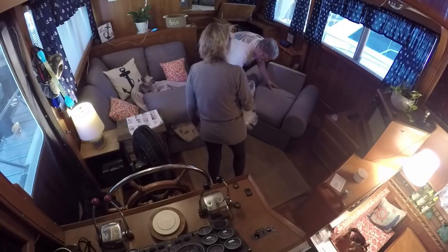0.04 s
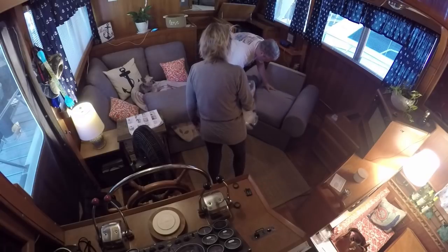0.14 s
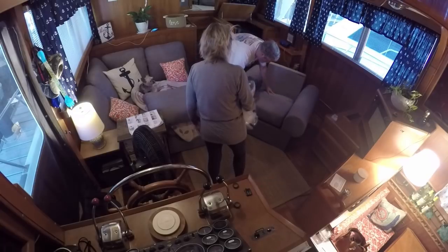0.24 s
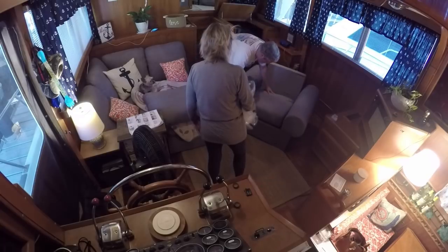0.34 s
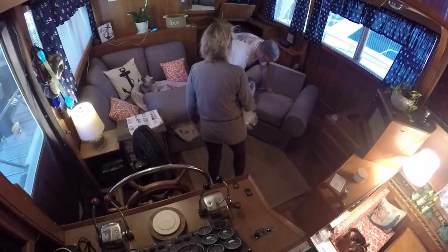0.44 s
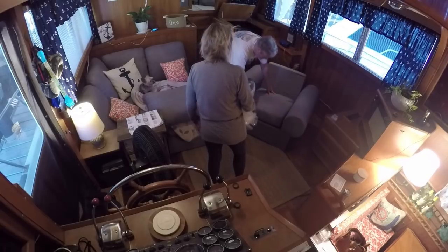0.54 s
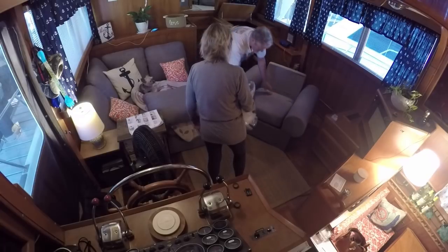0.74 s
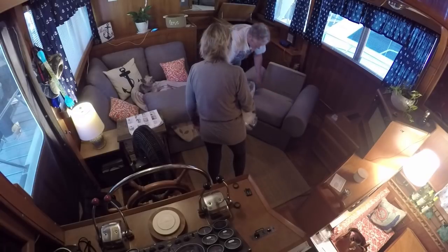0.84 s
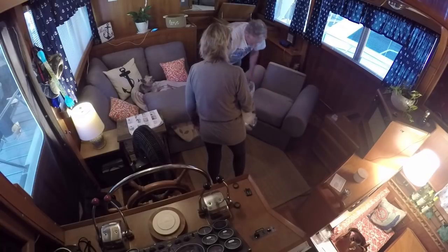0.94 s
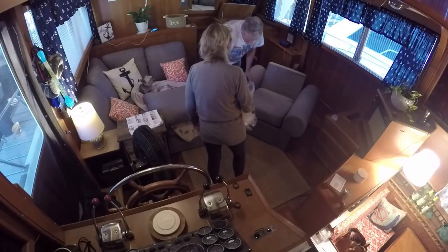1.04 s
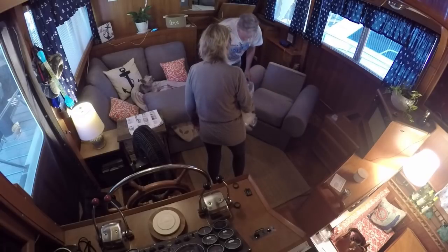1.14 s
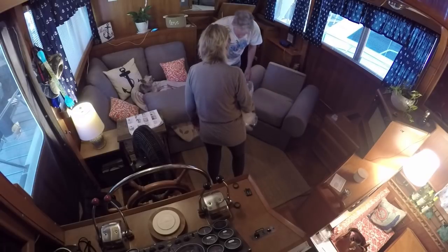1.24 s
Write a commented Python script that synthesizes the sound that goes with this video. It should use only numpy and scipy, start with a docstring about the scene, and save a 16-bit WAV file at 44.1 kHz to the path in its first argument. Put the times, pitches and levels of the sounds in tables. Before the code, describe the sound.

Upholstered furniture thumps into place in a small wood-panelled cabin. Its cloth slides and its frame groans briefly before the heavy landing and a wooden clack. A softer thump follows, then faint rustles over a low rumble.

```python
"""In a small wood-panelled cabin, a piece of upholstered furniture is shoved into place.
Its cloth slides and its frame groans. It lands with a heavy thump and a wooden clack, then drops
once more, softly, and its weight keeps the floor swaying. Faint rustles, two tiny ticks and small
bumps follow, over a low rumble, a hiss of air and an electric hum."""
import sys
import numpy as np
from scipy import signal
from scipy.fft import rfft, irfft
from scipy.io import wavfile

SR = 44100
rng = np.random.default_rng(int(sys.argv[2]) if len(sys.argv) > 2 else 0)


def to_wav(s):
    """Save 16-bit WAV."""
    ch = np.atleast_2d(s).T  # columns
    pcm = np.round(np.clip(ch, -1, 1) * 32767)  # PCM
    wavfile.write(sys.argv[1], SR, pcm.astype(np.int16))


N = 57330
T = np.arange(N) / SR

# The tone colour of each noise. Each row: pitch in Hz, relative level in dB.
AIR_COLOUR = [(100, -7.5), (180, -7), (250, -7.5), (360, -18.5), (480, -13.5), (850, -18.5), (1200, -22),
              (4700, -28), (15000, -38)]
RUMBLE_COLOUR = [(10, 15.5), (21, 7.5), (30, 1), (45, -1.5), (70, -4), (100, -22), (160, -21.5),
                 (400, -69.5)]
SLIDE_COLOUR = [(150, 8), (330, 12), (520, -1), (870, 3), (1300, -8), (2300, -3), (3500, -10), (6000, -17),
                (9000, -23), (15000, -35)]
BUMP_COLOUR = [(120, 0), (280, 0), (410, 3), (470, -12.5), (540, -0.5), (660, -9), (1000, -4.5),
               (2000, -12.5), (8000, -31)]
ECHO_COLOUR = [(120, 1), (250, 5.5), (550, -2.5), (950, -6.5), (1400, -9), (2300, -15.5), (2900, -22),
               (3500, -9.5), (7000, -10), (15000, -31)]
CLACK_COLOUR = [(700, -36), (1500, -9), (2000, 5), (2400, 4), (2950, 0), (3300, -10), (3900, -13),
                (6000, -23.5), (15000, -41)]
TICK_COLOUR = [(3000, -8), (6000, 2), (12000, -7), (15000, -13)]
RUSTLE_COLOUR = [(300, 4), (900, 2), (1600, 2.5), (2600, 4.5), (4500, 1), (7000, -11.5), (15000, -22)]

# How loud the rumble is. Each row: time in seconds, level in dB.
RUMBLE_LOUDNESS = [(0, -21.5), (.14, -35), (.55, -31), (.9, -40), (1.3, -44)]
# The hum's steady tones. Each row: pitch in Hz, average level in dB.
HUM_TONES = [(118.9, -48), (468.3, -71.5), (721.4, -70.5), (839.8, -69.5)]
# Cloth slides, and later rustles. Each row: peak time, rise and fall in seconds, level in dB.
CLOTH_SLIDES = [(.145, 0.044, 0.043, -49.5), (.192, 0.033, 0.14, -31.5), (.208, 0.043, 0.037, -28),
                (.246, 0.039, 0.054, -25.5)]
CLOTH_RUSTLES = [(.462, 0.015, 0.055, -59), (.543, 0.056, 0.033, -53.5), (.625, 0.098, 0.064, -52.5),
                 (.662, 0.044, 0.075, -54.5), (.77, 0.033, 0.11, -63), (.968, 0.014, 0.039, -77),
                 (1.05, 0.23, 0.12, -60.5), (1.16, 0.034, 0.22, -60.5)]
# Weight pressing on the floor. Each row: middle time and length in seconds, strength in dB.
FLOOR_PUSHES = [(.148, 0.0073, -41), (0.185, 0.014, -25.5), (.211, 0.01, -24), (0.247, 0.015, -0.5),
                (.306, 0.0154, -8), (0.439, 0.031, -7), (0.797, 0.015, -32), (0.96, 0.018, -32),
                (1.151, 0.016, -35)]
# Deep notes of floor and seat. Each row: pitch in Hz, gain in dB, ring time in seconds, swing direction.
FLOOR_NOTES = [(19.6, -16, 1.3, -1), (45, 8, .072, 1), (67, -2.5, .29, -1), (93, 5, .38, -1)]
# The frame's groans. Each row: peak time in seconds, pitch in Hz, level in dB, rise and fall in seconds.
FRAME_GROANS = [(0.173, 365, -26.5, 0.019, 0.038), (0.953, 400, -45, 0.023, 0.021),
                (0.969, 500, -46.5, 0.026, 0.019), (1.065, 538, -50.5, 0.031, 0.017),
                (1.074, 393, -48, 0.035, 0.048)]
# Padded knocks. Each row: start in seconds, level in dB, treble cutoff in Hz.
SOFT_BUMPS = [(0.234, -22, 1090), (0.4268, -26.5, 313), (0.528, -46, 200), (.597, -47.5, 400),
              (0.616, -48, 800), (0.653, -53, 665), (0.964, -55, 640), (1.056, -51, 710),
              (1.142, -50.5, 910), (1.153, -49.5, 720), (1.252, -53.5, 2600)]
# The two landings. Each row: start in seconds, frame gain in dB, treble cutoff in Hz, echo gain in dB.
LANDINGS = [(0.2444, -13, 1550, -18.5), (.4225, -21, 657, -25.5)]
# Notes of frame and panels. Each row: pitch in Hz, ring time in seconds, gain in dB at each landing.
FRAME_NOTES = [(96.9, 0.16, -4, 4), (177.8, 0.159, -1.5, -20), (226, 0.049, -0.5, -4),
               (272, 0.073, -1, -9.5), (287.3, 0.09, -5.5, -0.5), (311.2, 0.17, -40, -10.5),
               (363, 0.086, -13, -12), (432, 0.2, -9.5, -21.5), (484.3, 0.13, -10, -4.5),
               (529.6, 0.11, -2.5, -18.5), (581.8, 0.13, -11, -14), (692, 0.11, -6.5, -12.5),
               (867, 0.078, -11.5, -32), (905, 0.062, -6.5, -15), (970.6, 0.12, -11.5, -20.5),
               (1079, 0.034, -23, -11), (1220, 0.057, -14, -36)]
# High notes of the wood. Each row: pitch in Hz, gain in dB, ring time in seconds.
WOOD_NOTES = [(1637, -35, 0.22), (1943, -29, 0.16), (2270, -24.5, 0.16), (2750, -19, 0.13),
              (3070, -34, .12), (3250, -31, .11)]
# Two tiny ticks. Each row: start in seconds, level in dB.
BRIGHT_TICKS = [(0.4597, -57), (.966, -61)]


def from_db(db):
    """Turn decibels into a number to multiply by."""
    return 10 ** (np.asarray(db) / 20)


def rms_one(x):
    """Scale a sound so its average power is 1."""
    return x / np.sqrt(np.mean(x ** 2) + 1e-20)


def coloured(colour, source=None):
    """Give white noise, or another source, a tone colour and a power of 1."""
    hz, db = np.transpose(colour)
    f = np.fft.rfftfreq(N, 1 / SR) + 1e-3
    gain = from_db(np.interp(np.log(f), np.log(hz), db)) * np.minimum(f / hz[0], 1) ** 2
    return rms_one(irfft(rfft(rng.standard_normal(N) if source is None else source) * gain, N))


def soften(x, hz):
    """Take away the treble above hz, as a soft contact does."""
    return signal.sosfilt(signal.butter(2, min(hz, .45 * SR), fs=SR, output="sos"), x)


def burst(start, build, hold, t60):
    """Build up, hold, then fade by 60 dB in t60 (the ring time); all in seconds."""
    return np.clip((T - start) / build, 0, 1) * from_db(-60 * np.maximum(T - start - hold, 0) / t60)


def stroke(peak, rise, fall):
    """A swell that gains 20 dB in the rise time and loses 20 dB in the fall time."""
    return from_db(-20 * np.maximum((peak - T) / rise, (T - peak) / fall))


def push(middle, length):
    """A smooth bump of force that adds up to 1."""
    force = np.cos(np.pi * np.clip((T - middle) / length, -.5, .5)) ** 2
    return force / force.sum()


def ring(force, hz, t60):
    """Each push leaves one pure note dying away."""
    r, w = np.exp(-np.log(1000) / (t60 * SR)), 2 * np.pi * hz / SR
    return signal.lfilter([0, np.sin(w)], [1, -2 * r * np.cos(w), r * r], force + 1e-18)


def background():
    """Air hisses, the cabin rumbles and something electric hums."""
    hiss = from_db(-55.5) * coloured(AIR_COLOUR)
    times, levels = np.transpose(RUMBLE_LOUDNESS)
    rumble = from_db(np.interp(T, times, levels)) * coloured(RUMBLE_COLOUR)
    hum = sum(np.sqrt(2) * from_db(db) * np.sin(2 * np.pi * (hz * T + rng.random()))
              for hz, db in HUM_TONES)
    return hiss + rumble + hum


def rubbing_cloth(strokes, colour):
    """Fibres catch and slip in a dense crackle that swells with each stroke."""
    slips_per_second, spread_db = 2500, 2
    slips = (rng.random(N) < slips_per_second / SR) * rng.choice([-1, 1], N)
    sizes = from_db(spread_db * np.minimum(rng.exponential(1, N), 4))
    friction = coloured(colour, 0.45 * rms_one(slips * sizes) + rng.standard_normal(N))
    power = sum((from_db(db) * stroke(peak, rise, fall)) ** 2 for peak, rise, fall, db in strokes)
    return friction * np.sqrt(power)


def floor_boom():
    """Weight comes onto the floor in soft pushes and sets it swaying with deep notes."""
    force = sum(from_db(db) * push(middle, length) for middle, length, db in FLOOR_PUSHES)
    return sum(sign * from_db(db) * ring(force, hz, t60) for hz, db, t60, sign in FLOOR_NOTES)


def frame_groans():
    """The frame sticks and slips as it moves and settles, giving brief, uneven tones."""
    out = 0
    for peak, hz, db, rise, fall in FRAME_GROANS:
        wobble = 0.64 * rms_one(soften(rng.standard_normal(N), hz=71.5))  # in radians
        out += from_db(db) * stroke(peak, rise, fall) * np.sin(2 * np.pi * hz * T + wobble)
    return out


def soft_bumps():
    """Light padded knocks, heard mostly through the cabin."""
    out = 0
    for start, db, cutoff_hz in SOFT_BUMPS:
        noise = rms_one(soften(coloured(BUMP_COLOUR), cutoff_hz))
        out += from_db(db) * noise * burst(start, build=0.00187, hold=0.013, t60=0.12)
    return out


def landing_thumps():
    """Each landing shakes the frame and panels in its own way; they ring out into the cabin."""
    out = 0
    for landing, (start, frame_db, cutoff_hz, echo_db) in enumerate(LANDINGS):
        frame = 0
        for hz, t60, *levels in FRAME_NOTES:
            tone = from_db(frame_db + levels[landing]) * np.sin(2 * np.pi * hz * (T - start))
            frame += tone * burst(start, build=0.00247, hold=0.017, t60=t60)
        echo = coloured(ECHO_COLOUR) * burst(start, build=0.0028, hold=0.018, t60=0.21)
        out += soften(frame + from_db(echo_db) * echo, cutoff_hz)
    return out


def wooden_clack():
    """Wood hits wood at the first landing: a hard crack, its echo and a few high notes."""
    start = 0.2474  # seconds
    hit = burst(start, build=0.00057, hold=0.0011, t60=0.024)
    echo = from_db(-25) * burst(start, build=0.0053, hold=0.0048, t60=0.3)
    crack = from_db(-17.5) * (hit + echo) * coloured(CLACK_COLOUR)
    force = push(start, length=0.00058)
    return crack + sum(from_db(db) * ring(force, hz, t60) for hz, db, t60 in WOOD_NOTES)


def bright_ticks():
    """Two tiny, faint, bright ticks."""
    loudness = sum(from_db(db) * burst(start, build=0.00052, hold=0.00092, t60=0.043)
                   for start, db in BRIGHT_TICKS)
    return coloured(TICK_COLOUR) * loudness


def scene():
    """All the sounds add up in one channel."""
    shove = floor_boom() + landing_thumps() + wooden_clack() + rubbing_cloth(CLOTH_SLIDES, SLIDE_COLOUR)
    small = frame_groans() + rubbing_cloth(CLOTH_RUSTLES, RUSTLE_COLOUR) + bright_ticks() + soft_bumps()
    return (shove + small + background())[None]


def record(dry):
    """The loudest peaks are flattened, then the highest treble is cut away."""
    peak_limit, cutoff_hz = 0.95, 15400
    treble_cut = signal.ellip(10, .1, 80, cutoff_hz, fs=SR, output="sos")
    return signal.sosfilt(treble_cut, np.clip(dry, -peak_limit, peak_limit))


dry = scene()
out = record(dry)
to_wav(out)
```